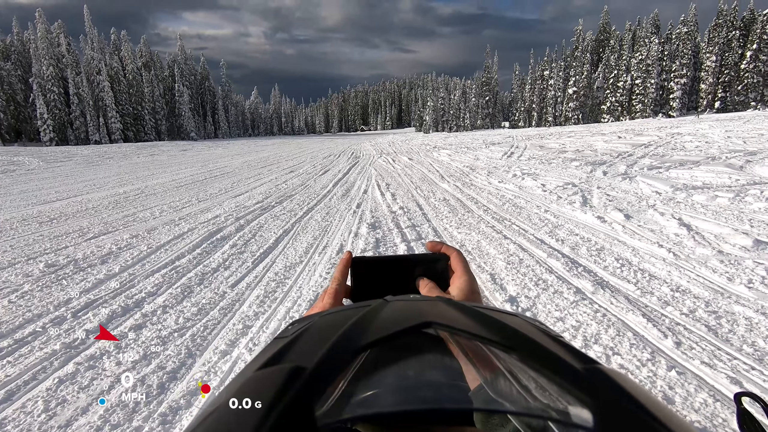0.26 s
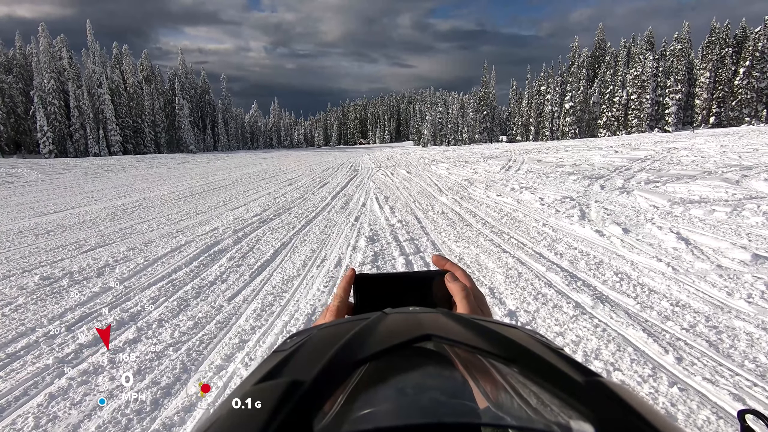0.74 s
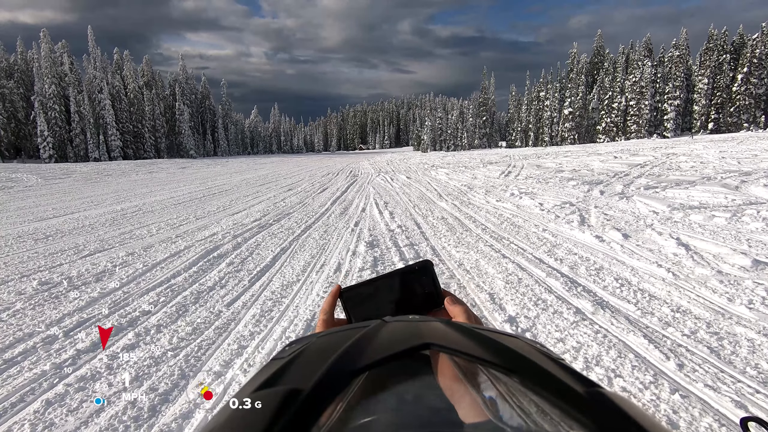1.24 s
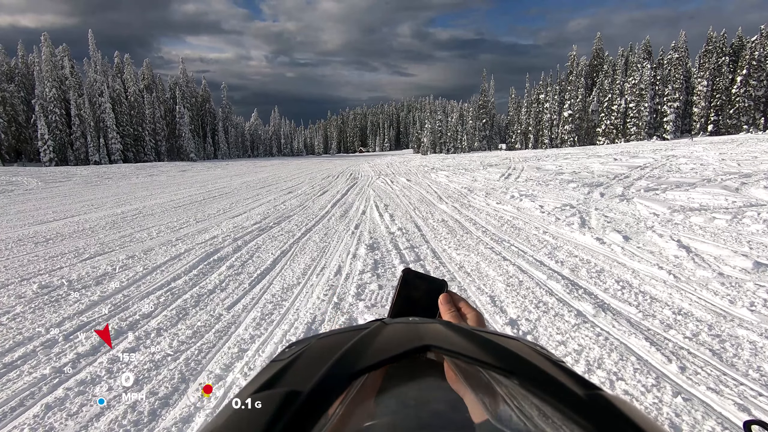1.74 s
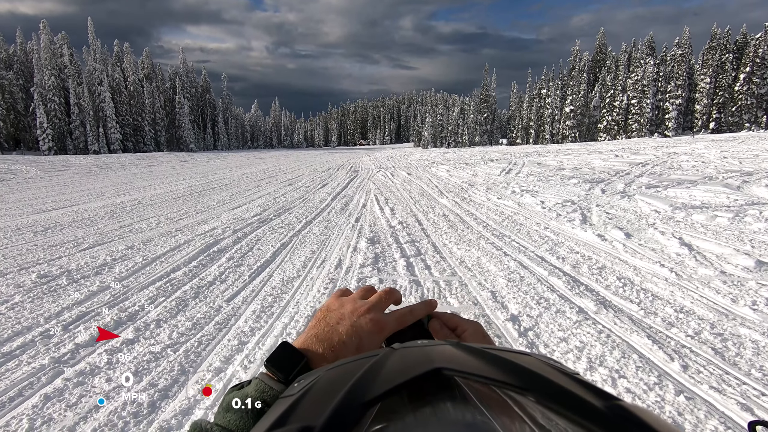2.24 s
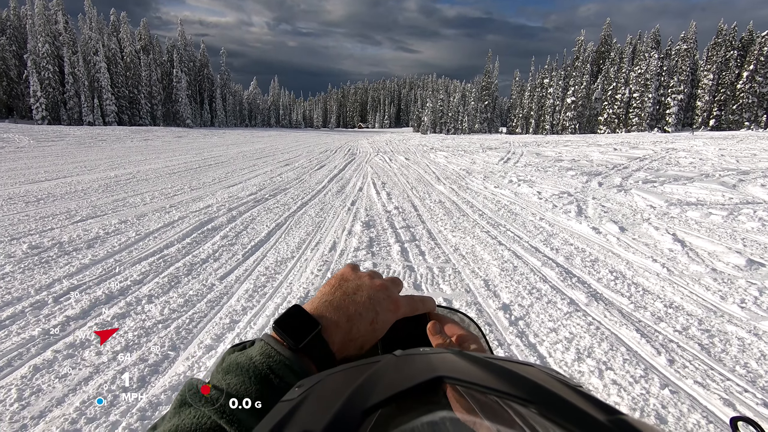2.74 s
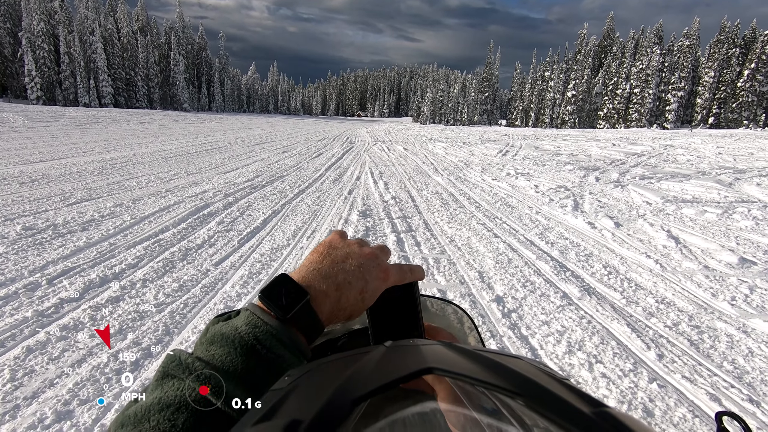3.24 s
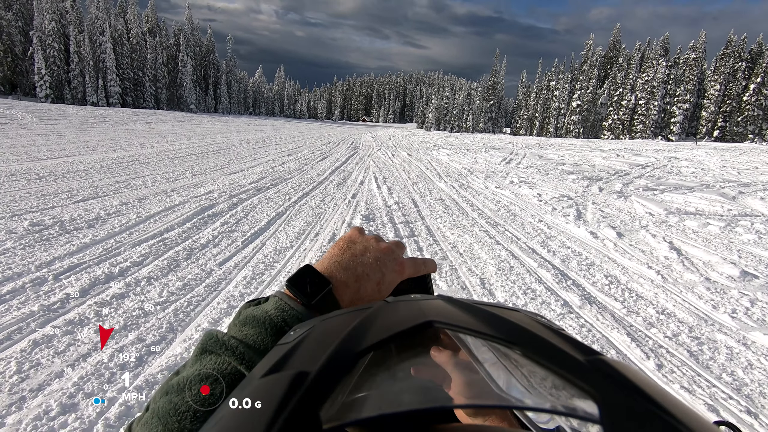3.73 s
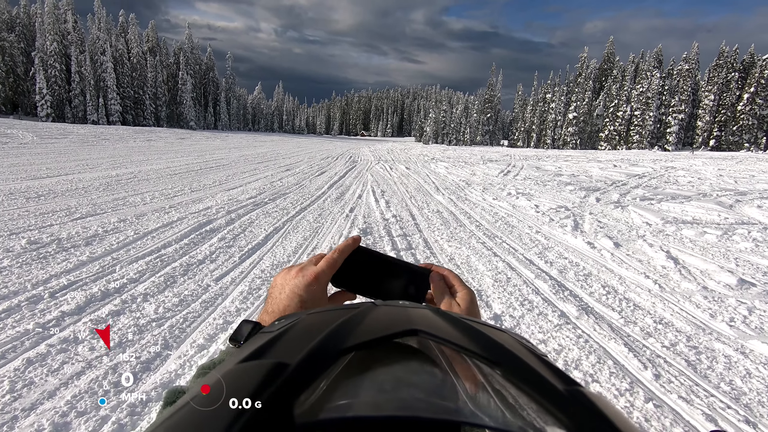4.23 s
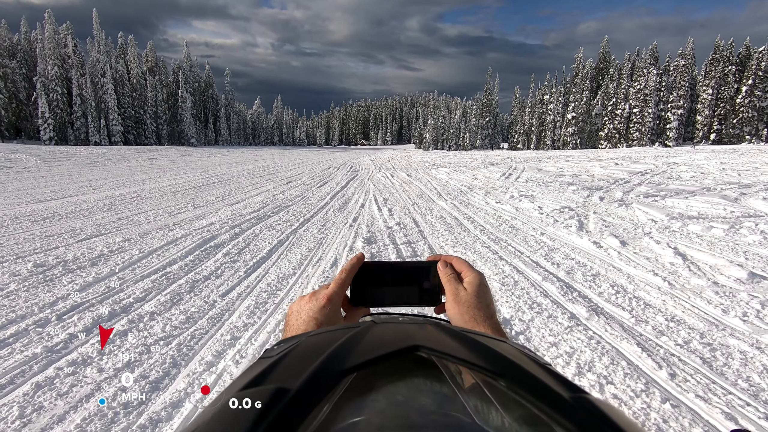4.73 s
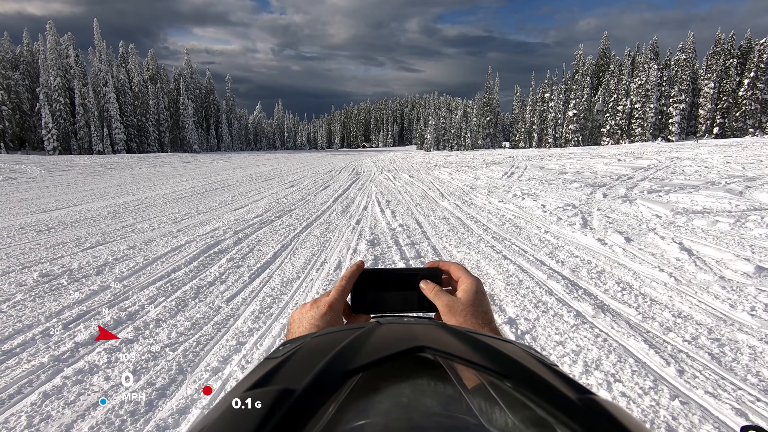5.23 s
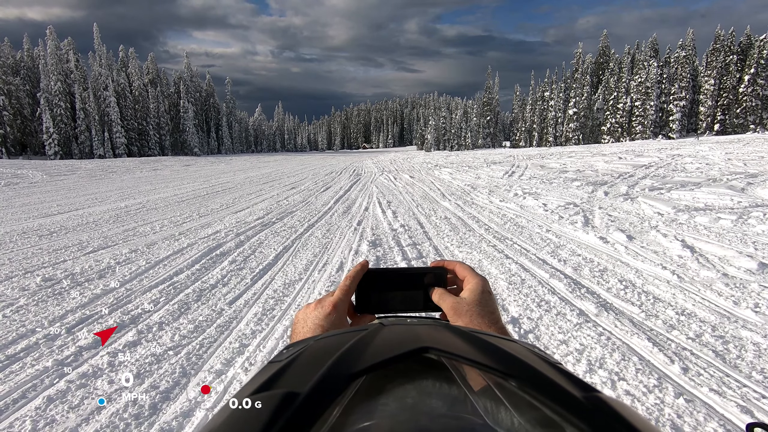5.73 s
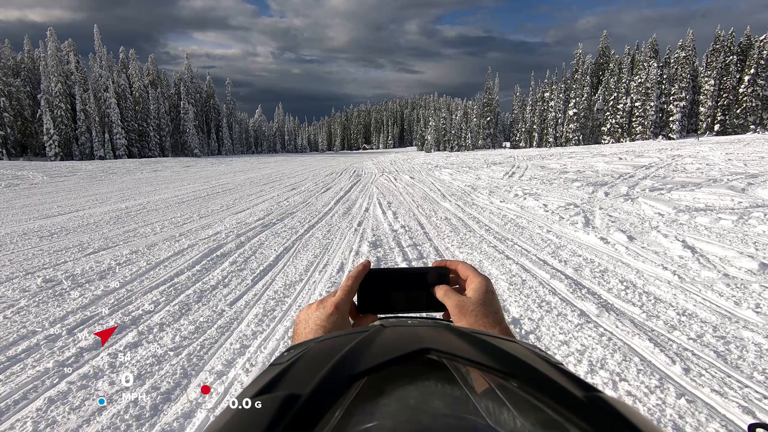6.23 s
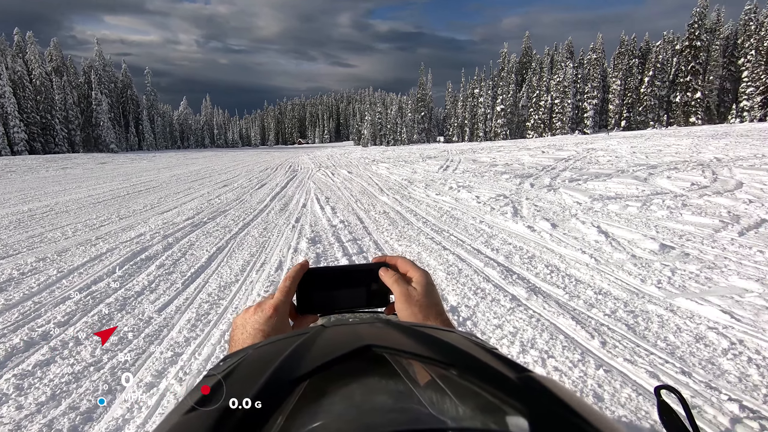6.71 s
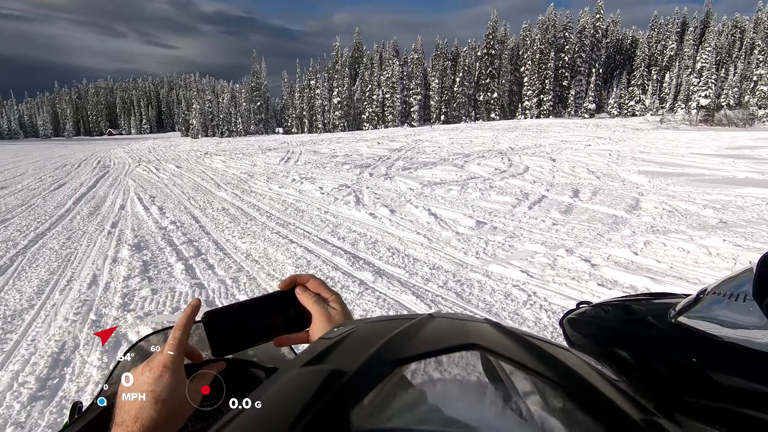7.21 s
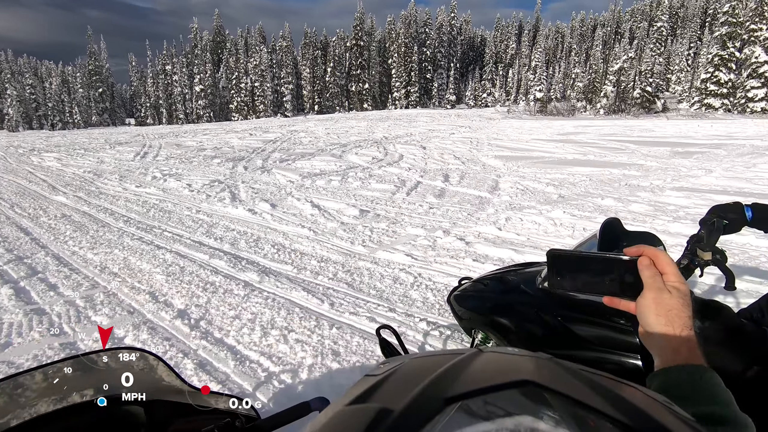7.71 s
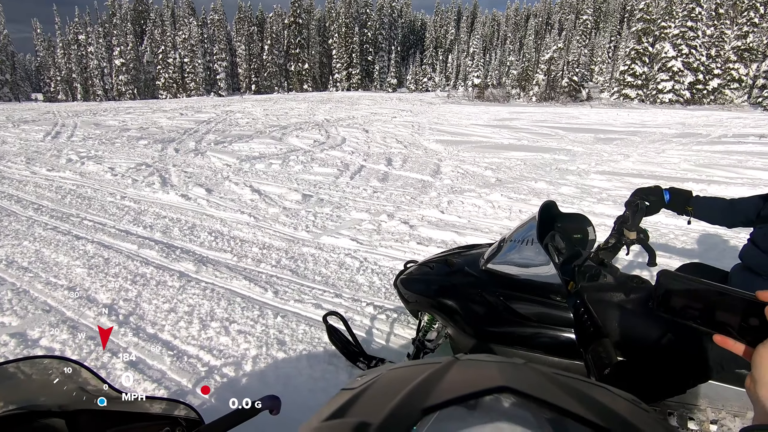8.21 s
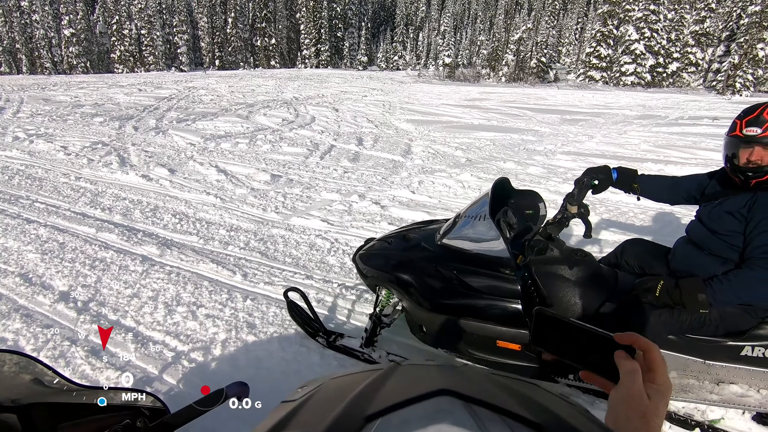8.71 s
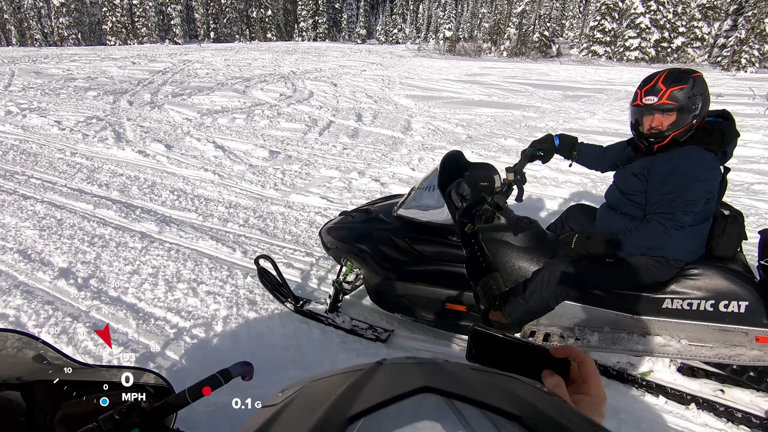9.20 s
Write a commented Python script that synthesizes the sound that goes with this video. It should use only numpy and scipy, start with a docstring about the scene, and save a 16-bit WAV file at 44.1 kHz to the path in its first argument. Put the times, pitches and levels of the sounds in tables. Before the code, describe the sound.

Close uneven snowmobile idle chugs and pops beside a second buzzing sled, which barks through a short throttle blip near the end and falls back.

```python
"""Two two-stroke snowmobiles on open snow, heard at the two ports of a rider's helmet.
From the start the neighbour's engine settles: firing orders through a pipe, plus rattle, hiss and ticks.
Beside it the rider's own engine idles unevenly: firings ring a muffler and tail pipe, strong ones pop.
At about 7 s the head turns to the neighbour, which is then blipped: hard firings bark as bursts of noise.
The neighbour's speed falls back at the end."""
import sys
import numpy as np
from scipy import signal
from scipy.fft import rfft, irfft, next_fast_len
from scipy.io import wavfile
from scipy.ndimage import uniform_filter1d, map_coordinates

SR = 44100
rng = np.random.default_rng(int(sys.argv[2]) if len(sys.argv) > 2 else 0)


def inscribe(sig):
    """Save sig as 16-bit PCM at rate SR to the path in sys.argv[1].

    A 1-D sig is mono; a 2-D sig holds one channel per row.
    Samples are clipped to [-1, 1] before scaling.
    """
    pcm = np.round(np.clip(np.atleast_2d(sig).T, -1, 1) * 32767)
    wavfile.write(sys.argv[1], SR, pcm.astype(np.int16))


def makeup_ratio(level_db):
    """Linear amplitude ratio for a level in decibels (20 dB per factor of ten)."""
    decades = np.asarray(level_db, float) / 20
    return 10 ** decades


N = 416921


def unit(x):
    """Scale to rms 1."""
    return x / np.sqrt(np.mean(x ** 2) + 1e-20)


def along(points, hz):
    """Read (frequency [Hz], value) points on a log axis."""
    f, v = np.transpose(points)
    return np.interp(np.log(hz + 1), np.log(f + 1), v)


def curves(rows):
    """One value per sample for each column after the time."""
    s, *cols = np.transpose(rows)
    return [np.interp(np.arange(N) / SR, s, c) for c in cols]


def wobble(count):
    """Smooth random curve, count knots a second."""
    return map_coordinates(rng.standard_normal(size=500), [np.arange(N) * count / SR], mode="wrap")


def impulses(rows):
    """One-sample impulses from (time [s], level [dB]) rows."""
    s, level_db = np.transpose(rows)
    train = np.zeros(N)
    train[np.round(s * SR).astype(int)] = makeup_ratio(level_db)
    return train


def decaying(x, length, decay_s):
    """Give each impulse an exponential tail, length samples long."""
    return signal.fftconvolve(x, np.exp(-np.arange(length) / SR / decay_s))[:N]


def filtered(x, response):
    """Apply a complex frequency response."""
    m = next_fast_len(N + SR // 2)
    return irfft(rfft(x, m) * response(np.fft.rfftfreq(m, 1 / SR)), m)[..., :N]


def resonances(modes):
    """Causal sum of (centre [Hz], width [Hz], peak gain [dB]) resonances, alternating in sign."""
    def response(f):
        total = 0
        for k, (centre, width, db) in enumerate(modes):
            damping = 1j * f * width
            total = total + (-1) ** k * makeup_ratio(db) * damping / (centre * centre - f * f + damping)
        return total
    return response


def soft(hz, edge_hz):
    """Causal second-order roll-off above the edge."""
    return 1 / (1 + 1j * hz / edge_hz) ** 2


def noise(spectrum):
    """Coloured noise of rms 1."""
    return unit(filtered(rng.standard_normal(N), lambda hz: makeup_ratio(along(spectrum, hz))))


# neighbour's exhaust pipe: (frequency [Hz], gain [dB])
PIPE_GAIN = [(30, -44), (75, -28.5), (100, 0.5), (146, 2), (185, -3.5), (225, -6.5), (260, -8.5),
             (295, -11.5), (400, -12.5), (450, -22.5), (530, -19.5), (660, -27.5), (950, -26.5),
             (1100, -56), (1700, -60)]


def exhaust_orders(hz, turns, blast, exhaust_db, bright):
    """Firing and half orders of the shaft, nearly in step so they sum to pulses, coloured by the pipe."""
    tone = 0
    for half in range(1, 25):
        # odd halves: the cylinders differ, more under load
        uneven_db = (0.13 * bright - 15) * (half % 2)
        # the pipe mouth sheds bass poorly
        uneven_db = uneven_db - 5 * (half < 4)
        db = exhaust_db + along(PIPE_GAIN, hz * half / 2) + bright * np.log2(half / 2 / 2)
        db = db + uneven_db + 1.56 * wobble(count=12) + 3.6 * blast * (half > 4)
        phase = half * turns + 0.15 * rng.random()
        tone = tone - np.sqrt(2) * makeup_ratio(db) * np.sin(2 * np.pi * phase)
    return tone


# orders humming through the crankcase:
# (multiple of firing rate, base level [dB], loss with head ahead [dB])
HUM_ORDERS = [(3, -47, 0.5), (4, -56, 1.5), (5, -52, 16), (6, -62, 10), (9, -63, 16), (10.5, -62, 16)]
HUM_DB_PER_RATTLE_DB = 0.26  # over the quietest rattle


def crankcase_hum(turns, turn, rattle_db):
    """Sines at firing-rate multiples that grow with the rattle; the head ahead shades them."""
    tone = 0
    growth_db = HUM_DB_PER_RATTLE_DB * (rattle_db - rattle_db.min())
    for order, hum_db, shade_db in HUM_ORDERS:
        db = hum_db + growth_db - shade_db * (1 - turn) + 3 * wobble(count=6)
        tone = tone + np.sqrt(2) * makeup_ratio(db) * np.sin(2 * np.pi * (2 * order * turns + rng.random()))
    return tone


def shaft_gate(turns):
    """Two decaying swells a shaft turn, one stronger."""
    return 1 + 0.4 * np.exp(-7 * (turns % 1)) + 0.3 * np.exp(-7 * ((turns + .5) % 1))


# bodywork and intake rattle: (frequency [Hz], density [dB per Hz])
RATTLE_SPECTRUM = [(530, -28.5), (900, 0), (1120, -4), (1320, -9), (1450, -4.5), (1560, -3), (1850, -4),
                   (2350, -19.5), (3040, -29), (4150, -19), (5000, -27.5), (6600, -33), (10600, -51),
                   (14300, -62), (15200, -65), (22000, -120)]
# ringing panels: (centre [Hz], width [Hz], gain [dB])
PANEL_MODES = [(1525, 31, 0), (1880, 95, 1.5), (2255, 35, 5), (2490, 38, 13), (2870, 150, 2), (3630, 34, 5),
               (3580, 26, 3.5)]
# colour facing the rattle over its colour from the side: (frequency [Hz], gain [dB])
FACING_GAIN = [(600, 7.5), (1100, -1), (1550, 1.5), (2200, 4.5), (3500, 1.5), (6000, 2.5), (14000, -1.5)]


def bodywork_rattle(gate, blast, turn, rattle_db):
    """Shaft-gated noise that also rings the panels; its colour shifts as the head turns."""
    flutter_db = .7 * wobble(count=14) + .7 * wobble(count=45) + 1.1 * blast
    rattle = noise(RATTLE_SPECTRUM) * gate * makeup_ratio(flutter_db)
    rattle = rattle + filtered(rattle, resonances(PANEL_MODES))
    facing = filtered(rattle, lambda f: makeup_ratio(along(FACING_GAIN, f)))
    return makeup_ratio(rattle_db) * unit((1 - turn) * rattle + turn * facing)


def exhaust_puffs(turns, blast, exhaust_db, bright):
    """Gas puffs from the pipe at each firing: decaying noise through a doubled resonance."""
    chuff = rng.standard_normal(N) * np.exp(-5 * (2 * turns % 1)) * makeup_ratio(1.1 * blast)
    chuff = filtered(chuff, lambda f: resonances([(520, 500, 0)])(f) ** 2)
    return makeup_ratio(exhaust_db + 0.73 * bright - 21) * unit(chuff)


# intake hiss: (frequency [Hz], density [dB per Hz])
INTAKE_SPECTRUM = [(1200, -26.5), (1800, 8), (2400, 1.5), (3100, 4.5), (3900, 0), (4500, -14.5),
                   (5500, -10.5), (10000, -19), (14500, -45.5), (22000, -120)]


def intake_hiss(gate, blast, hiss_db):
    """Rushing intake air: noise gated by the shaft and varied by each firing."""
    return makeup_ratio(hiss_db + 1.7 * blast) * gate * noise(INTAKE_SPECTRUM)


# tick level law: (base [dB], speed [dB per octave], speeding up [dB per octave/s],
# slowing [dB per octave/s], full head turn [dB])
TICK_LAW = (-81, -6.5, 1.5, 5.5, 16.5)
REFERENCE_HZ, RATE_SMOOTH_S = 73, 0.033  # neighbour's settled firing rate; averaging of speed change


def shaft_ticks(speed_hz, turns, turn):
    """One ringing noise tick a shaft turn, each of its own size; level follows speed and its change."""
    octaves = np.log2(speed_hz / REFERENCE_HZ)
    rates = np.clip(np.gradient(octaves) * SR * [[1], [-1]], 0, None)
    load, coast = uniform_filter1d(rates, int(RATE_SMOOTH_S * SR))
    tick_db = np.dot(TICK_LAW, [np.ones(N), octaves, load, coast, turn])
    strength = makeup_ratio(2.4 * rng.standard_normal(size=700))[turns.astype(int)]
    ticks = rng.standard_normal(N) * strength * np.exp(-18 * (turns % 1))
    ticks = filtered(ticks, lambda f: resonances([(3600, 1500, 0)])(f) ** 2)
    return makeup_ratio(tick_db) * unit(ticks)


# neighbour's speed: (time [s], firing rate [Hz], exhaust level [dB])
NEIGHBOUR_SPEED = [(0, 92.4, -27), (.3, 87.58, -29), (1.48, 75.49, -26), (3.4, 73.93, -27),
                   (5.55, 72.3, -26.5), (6.4, 70.36, -28), (7.16, 65.7, -31), (7.6, 61.84, -32),
                   (7.768, 61.62, -31), (7.894, 77.33, -23), (7.95, 80.54, -33), (8.03, 82.36, -25),
                   (8.132, 95.55, -33.5), (8.196, 96.63, -30), (8.45, 92.68, -26.5), (8.498, 100.9, -19),
                   (8.592, 126.4, -25), (8.63, 131.1, -23), (8.748, 135.2, -24.5), (8.78, 129.2, -31),
                   (8.82, 119.1, -30), (8.85, 114, -32), (8.964, 104.3, -29), (9.184, 101, -32.5),
                   (9.27, 95.15, -28), (9.39, 91.85, -30.5), (9.45, 91.2, -26)]
# mechanical noise: (time [s], rattle level [dB], intake hiss level [dB])
NEIGHBOUR_CLATTER = [(0, -45.5, -58.5), (.5, -51, -73), (1.4, -54.5, -74), (6.9, -57.5, -75),
                     (7.7, -57, -62), (7.79, -52, -90), (7.87, -49.5, -51.5), (7.98, -54, -65.5),
                     (8.16, -45.5, -56), (8.3, -47.5, -59.5), (8.5, -45, -59), (8.53, -41.5, -46.5),
                     (8.62, -39.5, -45), (8.72, -39, -46), (8.84, -42, -49), (8.95, -45, -52),
                     (9.45, -46.5, -56.5)]
# exhaust brightness, up with an open throttle: (time [s], tilt of the orders [dB per octave])
EXHAUST_TILT = [(0, -11), (1, -8.5), (1.6, -12.5), (7.7, -10.5), (7.9, -9), (8.1, -4.5), (8.2, -9.5),
                (8.45, -3.5), (8.55, 1), (8.62, 6.5), (8.74, 4.5), (8.8, -6), (9, -6), (9.25, -9.5),
                (9.45, -11)]


def neighbour(turn):
    """Two-cylinder engine: one shaft phase times exhaust, hum, rattle, hiss and ticks."""
    speed_hz, exhaust_db = curves(NEIGHBOUR_SPEED)
    rattle_db, hiss_db = curves(NEIGHBOUR_CLATTER)
    bright, = curves(EXHAUST_TILT)
    hz = speed_hz * (1 + 0.0032 * wobble(count=10))
    turns = np.cumsum(hz) / SR / 2  # two firings a turn
    # no two firings are equally hard
    blast = rng.standard_normal(size=1400)[(2 * turns + .5).astype(int)]
    blast = uniform_filter1d(blast, size=80)
    gate = shaft_gate(turns)
    exhaust = exhaust_orders(hz, turns, blast, exhaust_db, bright)
    exhaust = exhaust + exhaust_puffs(turns, blast, exhaust_db, bright)
    mechanical = crankcase_hum(turns, turn, rattle_db) + bodywork_rattle(gate, blast, turn, rattle_db)
    return exhaust + mechanical + intake_hiss(gate, blast, hiss_db) + shaft_ticks(speed_hz, turns, turn)


PUSH_DB, THUMP_DB = 26.5, 53  # drive of a firing; drive of a pop, over its level


def muffled(f):
    """Band left by the muffler: roll-off above 359 Hz, low cut at 60 Hz."""
    return soft(f, edge_hz=359) / (1 - 1j * 60 / (f + 1)) ** 2


# own muffler: (centre [Hz], width [Hz], gain [dB])
MUFFLER_MODES = [(103, 13.7, 6.5), (113.4, 10.2, 5.5), (122.8, 12.8, 9), (150.6, 21.5, 0)]


def muffler_drone(firings, at, pops):
    """Firings and pops ring the muffler; firing strength throbs about every two and a half firings,
    with a weaker swing over five."""
    lope = firings / 5.1 + .15 * wobble(count=5)
    size = 0.93 + 0.33 * np.cos(2 * np.pi * lope) + 1.4 * np.cos(2 * np.pi * 2 * lope + 1.73)
    pushes = np.zeros(N)
    pushes[at] = makeup_ratio(PUSH_DB) * (size[at] + 0.33 * rng.standard_normal(len(at)))
    drive = pushes + makeup_ratio(THUMP_DB) * pops
    return filtered(drive, lambda f: resonances(MUFFLER_MODES)(f) * muffled(f))


# own tail pipe: (centre [Hz], width [Hz], gain [dB])
TAIL_MODES = [(206.6, 41.5, -10), (261.8, 35.4, -6.5), (297.1, 29.6, -9)]
TAIL_BETWEEN, TAIL_CHUG = 0.38, 1.27  # firing size between chugs; added per unit of chug


def tail_pipe(at, chugging, pops):
    """Firings ring the tail pipe, hardest in a chug; pops ring it too."""
    kicks = np.zeros(N)
    luck = makeup_ratio(2.2 * rng.standard_normal(len(at)))
    kicks[at] = makeup_ratio(PUSH_DB) * (TAIL_BETWEEN + TAIL_CHUG * chugging[at]) * luck
    drive = kicks + makeup_ratio(THUMP_DB + 4.5) * pops
    return filtered(drive, lambda f: resonances(TAIL_MODES)(f) * muffled(f))


# gas rushing out in a chug: (frequency [Hz], density [dB per Hz])
RUSH_SPECTRUM = [(120, -38), (200, 2), (320, -2.5), (500, -10.5), (800, -20), (1200, -25), (3000, -47.5),
                 (22000, -120)]


def gas_rush(chugging):
    """Low noise that swells with each chug."""
    return makeup_ratio(-41) * chugging * noise(RUSH_SPECTRUM)


# exhaust mouth: (centre [Hz], width [Hz], gain [dB])
MOUTH_MODES = [(360, 320, 1), (950, 600, -6)]
MOUTH_DB, MOUTH_DELAY_S = 37, .0022  # the crack leaves just after the thump


def exhaust_mouth(pops, putts):
    """Pops and softened putts ring the mouth of the exhaust."""
    def mouth(f):
        late = np.exp(-2j * np.pi * f * MOUTH_DELAY_S)
        return resonances(MOUTH_MODES)(f) ** 2 * soft(f, edge_hz=2100) * late
    soft_putts = filtered(putts, lambda f: soft(f, edge_hz=520))
    return makeup_ratio(MOUTH_DB) * filtered(pops + makeup_ratio(5.0) * soft_putts, mouth)


# whirr with head ahead: (frequency [Hz], density [dB per Hz])
AHEAD_SPECTRUM = [(180, -18.5), (300, 0.5), (343, -19.5), (491, -6.5), (578, -26), (642, -8.5), (780, -19),
                  (853, -13), (1260, -22.5), (1690, -25.5), (2570, -33.5), (5850, -43), (9150, -39),
                  (10200, -44.5), (10600, -81.5), (14300, -69.5), (22000, -120)]
# whirr with head turned: (frequency [Hz], density [dB per Hz])
TURNED_SPECTRUM = [(180, -36.5), (300, -13), (476, -4), (537, -20.5), (1080, -9), (1400, -32.5),
                   (3680, -30.5), (5270, -38), (9710, -41.5), (10600, -65.5), (14300, -65.5), (22000, -120)]


def engine_whirr(turn, pops, putts):
    """Steady noise that swells after each pop and putt and crossfades in colour with the head."""
    puff = decaying(pops + putts, SR // 10, decay_s=0.0069)
    swell = (1 + 12 * puff) * makeup_ratio(0.3 * wobble(count=9) + 0.56 * wobble(count=30))
    ahead = np.sqrt(1 - turn) * makeup_ratio(-44.5) * noise(AHEAD_SPECTRUM)
    turned = np.sqrt(turn) * makeup_ratio(-49.5) * noise(TURNED_SPECTRUM)
    return swell * (ahead + turned)


# rumble under both engines: (frequency [Hz], density [dB per Hz])
RUMBLE_SPECTRUM = [(15, -23), (28, 2.5), (50, -1.5), (80, 0.5), (120, -40), (22000, -120)]


def low_rumble():
    """Slowly varying low noise, shaken through seat and helmet."""
    return makeup_ratio(-38 + 1.1 * wobble(count=3)) * noise(RUMBLE_SPECTRUM)


# own engine's speed: (time [s], firing rate [Hz])
IDLE_SPEED = [(0, 53.8), (2, 51.8), (6.42, 51.1), (8.08, 51.7), (8.26, 49.3), (8.42, 51.6), (9.45, 51.6)]
# strongest firings: (time [s], level [dB])
POP_FIRINGS = [(0.153, -39.5), (0.299, -27.5), (0.389, -27.5), (0.526, -42.5), (0.693, -36.5), (0.838, -38),
               (0.898, -35.5), (0.962, -40), (1.023, -41.5), (1.121, -40), (1.408, -40), (1.62, -31),
               (1.753, -31.5), (1.793, -25.5), (1.897, -36.5), (2.006, -34), (2.024, -37), (2.264, -33),
               (2.304, -40), (2.748, -29.5), (2.816, -38.5), (3.073, -32), (3.182, -29.5), (3.399, -34.5),
               (3.526, -34), (3.645, -31.5), (3.686, -38.5), (3.809, -42.5), (4.15, -36), (4.22, -31),
               (4.354, -31.5), (4.728, -40), (4.879, -36), (5.551, -32.5), (5.621, -40), (5.716, -30.5),
               (5.882, -39.5), (6.382, -34), (6.569, -36), (6.955, -38), (7.356, -29), (7.689, -48),
               (7.771, -39), (7.864, -28.5), (7.915, -24.5), (8.037, -22.5), (8.106, -26.5), (8.191, -30),
               (8.221, -32.5), (8.444, -26.5), (8.99, -24.5), (9.101, -31), (9.434, -36.5)]
# chugs of the loping idle: (time [s], strength [dB])
CHUG_STRENGTHS = [(0.156, -2.5), (0.304, 2.5), (0.399, 4.5), (0.536, 1), (0.707, 2), (0.839, 0.5),
                  (0.901, 3.5), (0.961, -2), (1.025, 1), (1.134, 1.5), (1.214, 2.5), (1.345, 1.5),
                  (1.42, 3), (1.516, -1), (1.623, 1.5), (1.757, 4), (1.907, 0.5), (2.014, 1.5),
                  (2.154, 2.5), (2.264, 4), (2.417, 4.5), (2.512, 1), (2.627, 1), (2.747, -3.5),
                  (2.831, 0.5), (2.95, 3.5), (3.069, 1.5), (3.186, 0), (3.294, 0.5), (3.53, 6), (3.65, 2.5),
                  (3.811, 5), (3.974, -2), (4.06, 0), (4.154, 1.5), (4.234, 3.5), (4.367, 3), (4.494, -4),
                  (4.567, -3.5), (4.669, 1.5), (4.775, -2), (4.889, 0.5), (5.011, -0.5), (5.095, -4.5),
                  (5.17, -1), (5.275, 0.5), (5.4, 1), (5.554, -0.5), (5.622, 0), (5.722, 1), (5.883, 3),
                  (6.031, -2.5), (6.12, 1), (6.267, 0.5), (6.397, 4.5), (6.565, 2), (6.691, 2), (6.998, 2),
                  (7.139, 3.5), (7.281, -4), (7.359, 3.5), (7.504, -0.5), (7.598, 0), (7.694, 0.5),
                  (7.777, 3.5), (7.917, 2), (8.042, 6), (8.111, 5), (8.195, 3.5), (8.995, 2), (9.098, 6.5),
                  (9.238, 3.5)]
CHUG_SIGMA_S, CHUG_DB_PER_DB = .013, .8  # chug spread; swell per dB of strength
PUTT_DB, PUTT_SPREAD_DB = -40, 2  # soft putts of the firings in a chug


def own_engine(turn):
    """Uneven firings drive muffler and tail pipe; the idle lopes in chugs, strong firings pop."""
    firings = np.cumsum(curves(IDLE_SPEED)[0] * (1 + .02 * wobble(count=12))) / SR
    at = np.flatnonzero(np.diff(np.floor(firings)))
    pops = impulses(POP_FIRINGS)
    chugs = impulses(np.array(CHUG_STRENGTHS) * [1, CHUG_DB_PER_DB])
    chugging = signal.fftconvolve(chugs, signal.windows.gaussian(SR // 5, CHUG_SIGMA_S * SR), "same")
    putts = np.zeros(N)
    putts[at] = chugging[at] * makeup_ratio(PUTT_DB + PUTT_SPREAD_DB * rng.standard_normal(len(at)))
    ringing = muffler_drone(firings, at, pops) + tail_pipe(at, chugging, pops)
    gas = gas_rush(chugging) + exhaust_mouth(pops, putts)
    return ringing + gas + engine_whirr(turn, pops, putts) + low_rumble()


# hard firings in the blip: (time [s], level [dB])
BARK_FIRINGS = [(8.4757, -28), (8.5232, -27.5), (8.5586, -32.5), (8.6106, -26.5), (8.6554, -34),
                (8.6988, -27.5), (8.7337, -37), (8.7894, -30)]
BARK_DECAY_S, BARK_THUD_DB = 0.0055, 38  # burst decay; thud drive


def barks():
    """Each hard firing of the neighbour is a short raspy burst of gas over a low thud."""
    blows = makeup_ratio(-9) * impulses(BARK_FIRINGS)
    shape = decaying(blows, SR // 20, BARK_DECAY_S)
    thud_modes = resonances([(55, 50, 0), (450, 500, -16)])
    thud = filtered(blows, lambda f: thud_modes(f) * soft(f, edge_hz=900))
    rasp = noise([(300, -38), (700, -1.5), (1800, 2), (3500, -8), (5000, -22), (12000, -39), (22000, -120)])
    return makeup_ratio(BARK_THUD_DB) * thud + shape * rasp


def ports(x, lean, lead):
    """Two ports differing in level and phase; their sum keeps its colour."""
    def pair(hz):
        ratio = makeup_ratio(along(lean, hz)) * np.exp(1j * np.interp(hz, *np.transpose(lead)))
        return 2 * np.array([ratio, np.ones_like(ratio)]) / (1 + ratio)
    return filtered(x, pair)


# scatter by snow and helmet: (frequency [Hz], relative level [dB])
SCATTER_LEVEL = [(30, -27.5), (100, -27.5), (300, -28.5), (600, -13), (1000, -12.5), (2000, -11.5),
                 (5000, -7), (10000, -6)]


def scattered(x):
    """Shifting reflections: short-time spectra with random phases, unrelated at the two ports."""
    hz, _, z = signal.stft(x, SR, nperseg=512)
    chance = np.exp(2j * np.pi * rng.random((2, *z.shape)))
    gain = makeup_ratio(along(SCATTER_LEVEL, hz) + 9.5)[:, None]
    return signal.istft(z * chance * gain, SR, nperseg=512)[1][:, :N]


# head direction: (time [s], turn [0-1])
HEAD_TURN = [(0, 0.06), (6.9, 0.18), (7.3, 0.63), (7.7, 0.81), (9.45, 0.92)]
# left against right, head ahead, the helmet shading one port: (frequency [Hz], level [dB])
AHEAD_LEAN = [(30, -.3), (60, -.4), (110, -.4), (190, -.5), (330, -1.2), (590, -6.5), (1040, -20.5),
              (1840, -9.5), (3250, -16), (5750, -5), (10200, -4.5)]
# left against right, head ahead: (frequency [Hz], phase lead of left [rad])
AHEAD_LEAD = [(0, 0), (300, -.15), (690, -0.8), (1120, -4.5), (1980, -4.5), (3100, -5), (3620, -2.5),
              (4130, -5.5), (4910, -9), (7150, -8.5), (8700, -9), (9990, -8.5), (10300, -1.5)]
# left against right, head turned: (frequency [Hz], level [dB])
TURNED_LEAN = [(60, -0.3), (120, -.3), (260, -0.4), (540, 0), (1130, 0), (2350, 0), (4890, 3), (10200, 1)]


def scene():
    """Both engines, crossfaded between two helmet responses as the head turns."""
    turn = np.clip(curves(HEAD_TURN)[0], 0, 1)
    engines = neighbour(turn) + own_engine(turn) + barks()
    engines = engines * signal.windows.tukey(N, .001)  # a few ms of fade at each end
    ahead = ports(engines, AHEAD_LEAN, AHEAD_LEAD)
    turned = ports(engines, TURNED_LEAN, [(0, 0)])
    return (1 - turn) * ahead + turn * turned + scattered(engines) * (1 - .5 * turn)


def band_limit(x):
    """A steep low-pass at the top of the band."""
    return signal.sosfilt(signal.butter(12, 15100, fs=SR, output="sos"), x)


def record(dry):
    """Low cut, a fast gain control that holds the throb down, then soft clipping."""
    x = filtered(dry, lambda hz: 1 / (1 - 1j * 30 / (hz + 1)) ** 2)
    level = np.sqrt(np.abs(uniform_filter1d(np.mean(x ** 2, axis=0), size=500)))  # about 11 ms
    x = makeup_ratio(2.5) * x / (2.0 + (level / 0.1) ** 2) ** 0.29
    mix = x / (1 + np.abs(x / .28) ** 4) ** (1 / 4)  # peaks round off softly
    return band_limit(mix)


dry = scene()
out = record(dry)
inscribe(out)
```